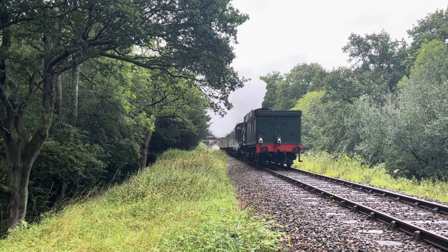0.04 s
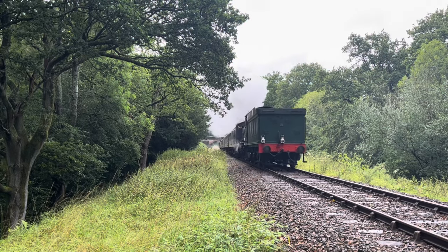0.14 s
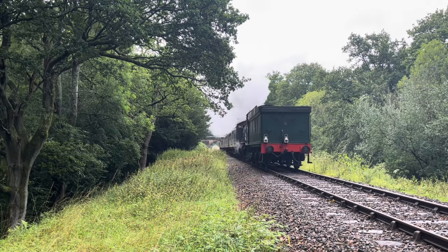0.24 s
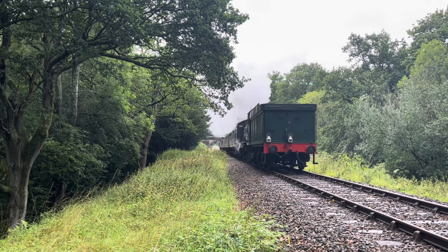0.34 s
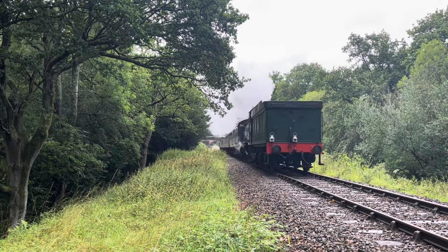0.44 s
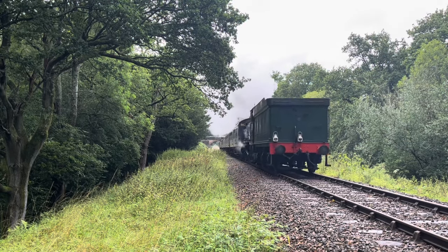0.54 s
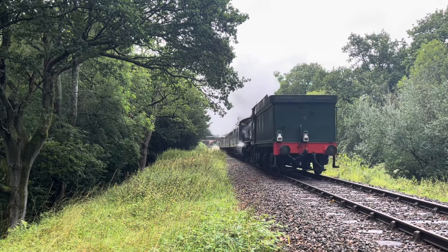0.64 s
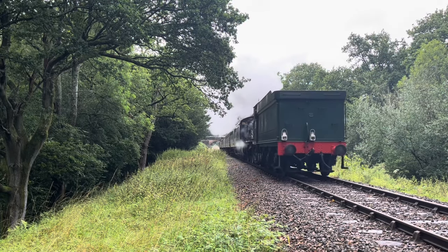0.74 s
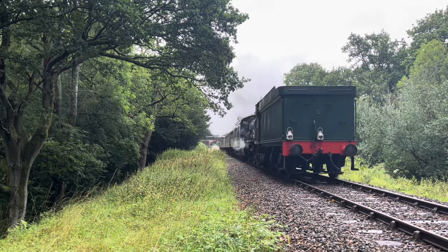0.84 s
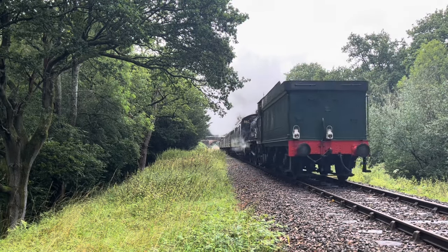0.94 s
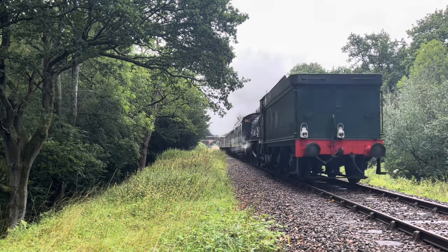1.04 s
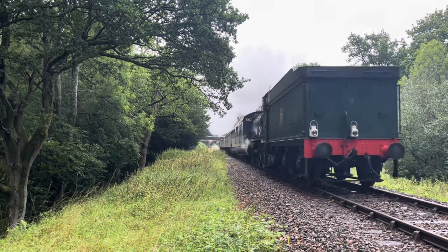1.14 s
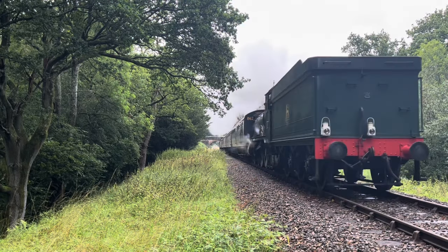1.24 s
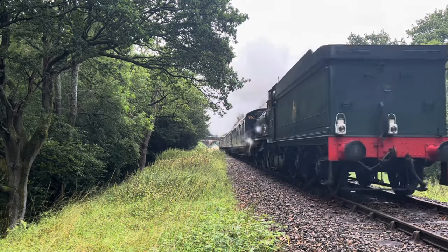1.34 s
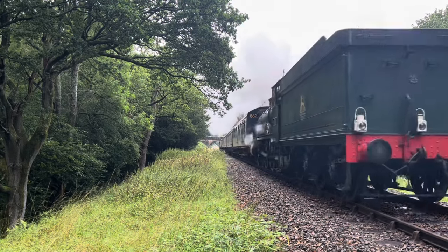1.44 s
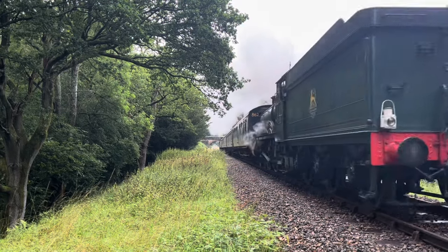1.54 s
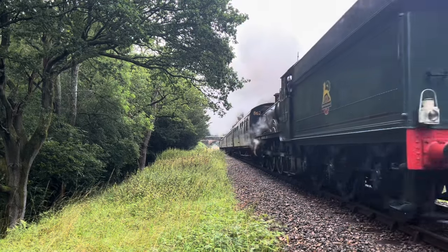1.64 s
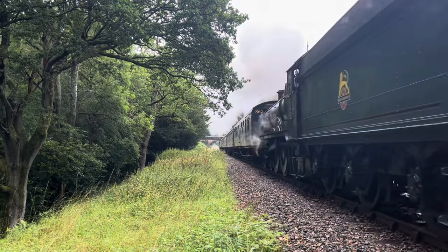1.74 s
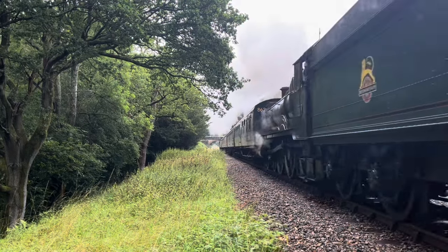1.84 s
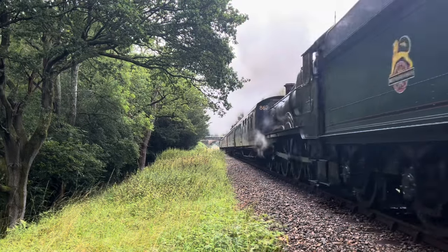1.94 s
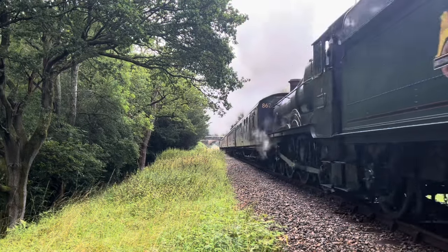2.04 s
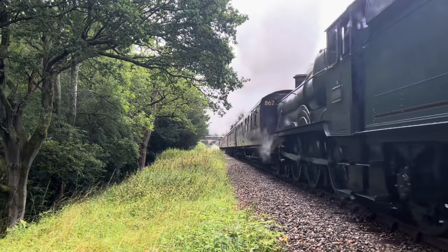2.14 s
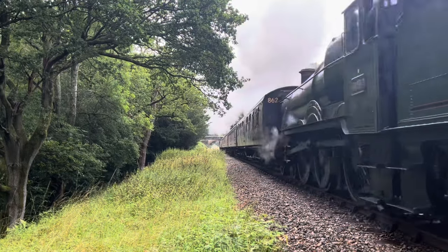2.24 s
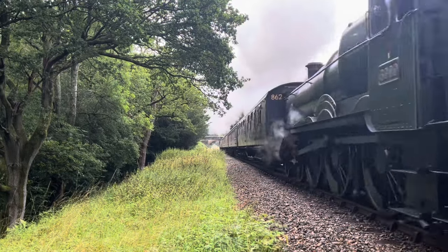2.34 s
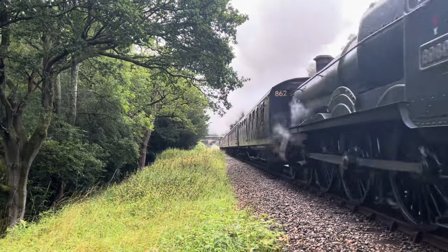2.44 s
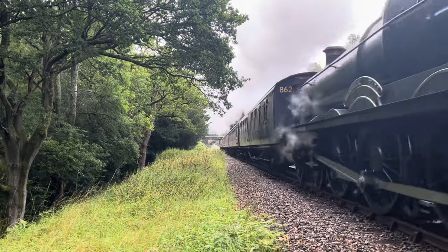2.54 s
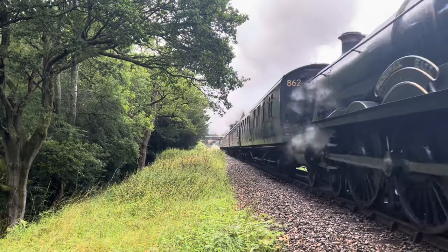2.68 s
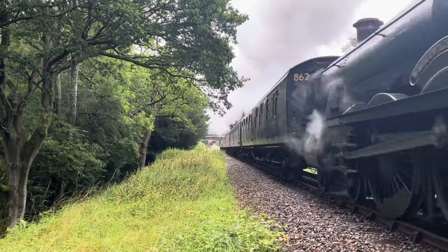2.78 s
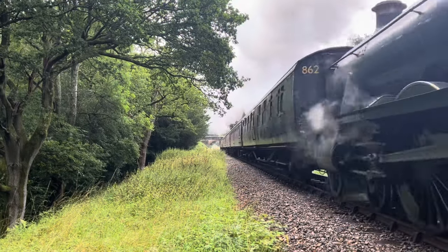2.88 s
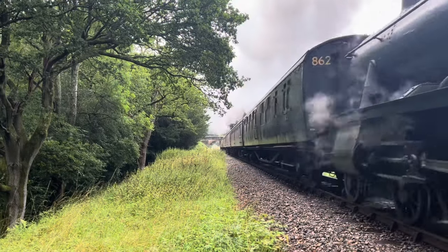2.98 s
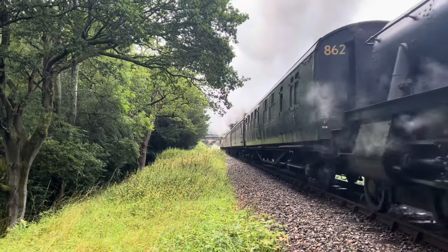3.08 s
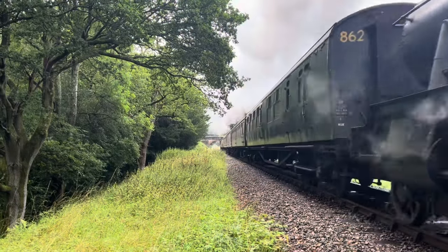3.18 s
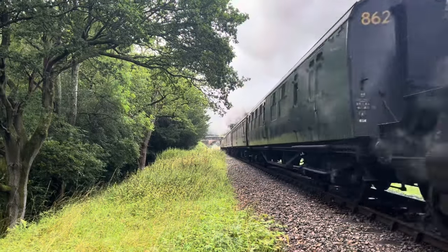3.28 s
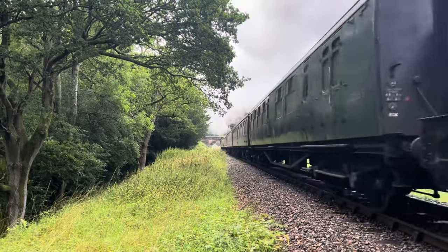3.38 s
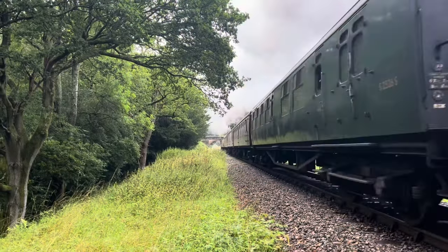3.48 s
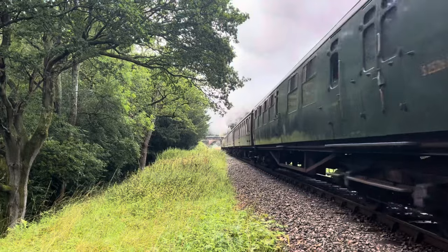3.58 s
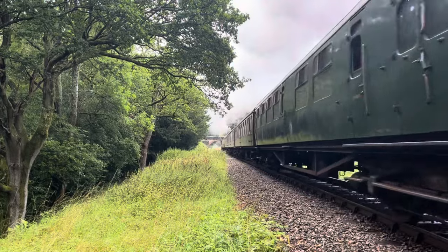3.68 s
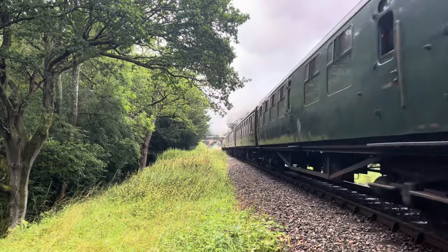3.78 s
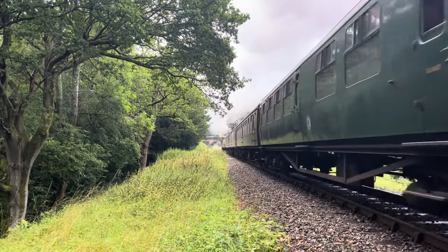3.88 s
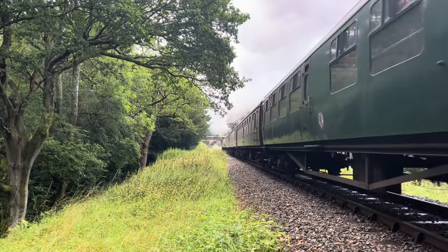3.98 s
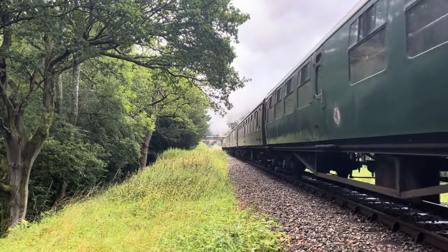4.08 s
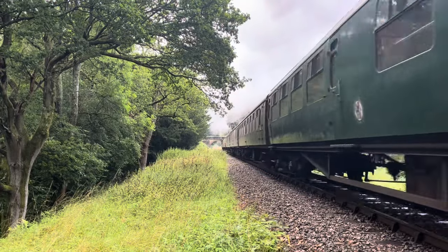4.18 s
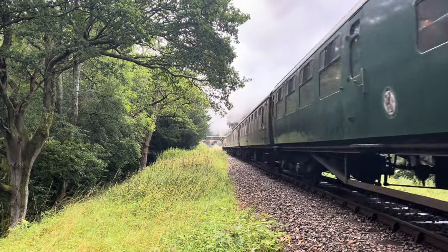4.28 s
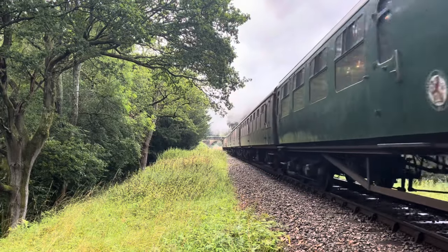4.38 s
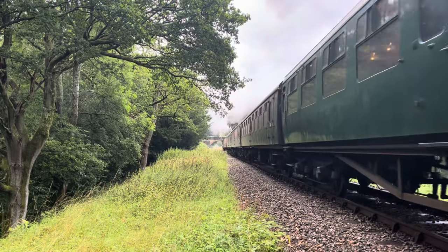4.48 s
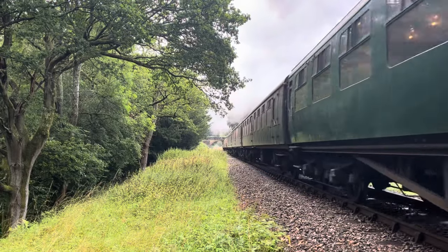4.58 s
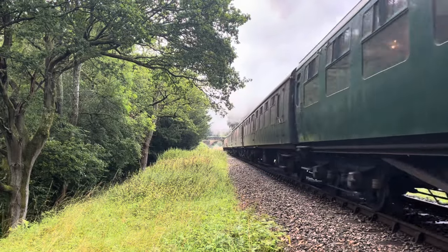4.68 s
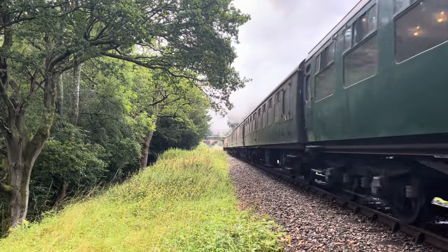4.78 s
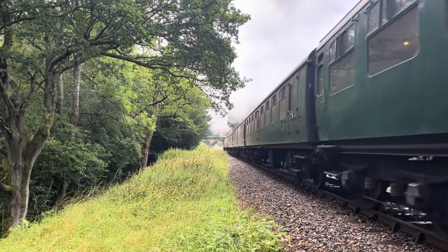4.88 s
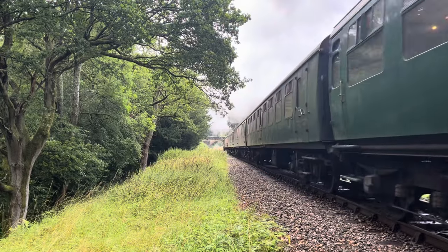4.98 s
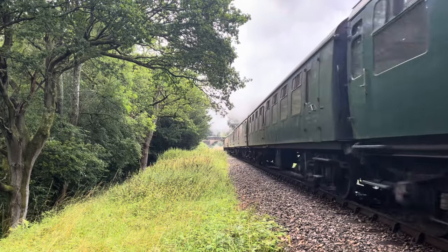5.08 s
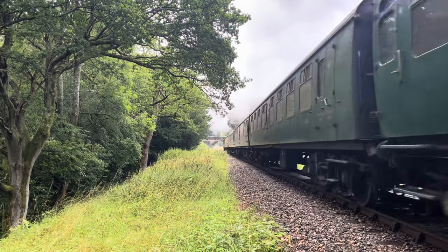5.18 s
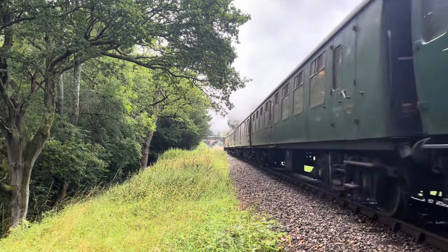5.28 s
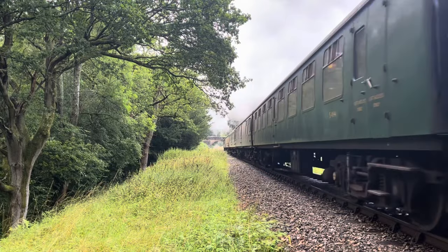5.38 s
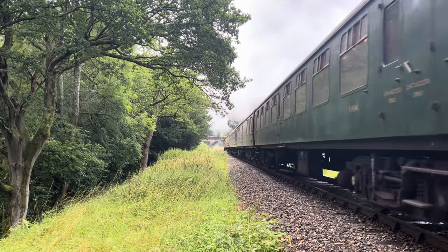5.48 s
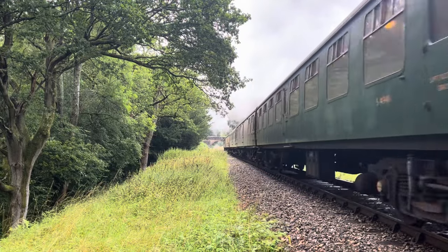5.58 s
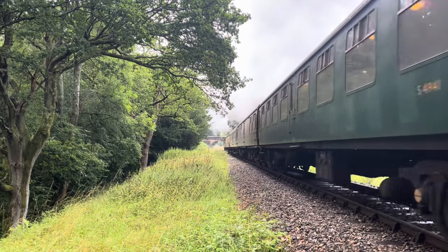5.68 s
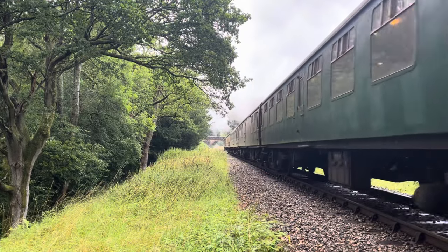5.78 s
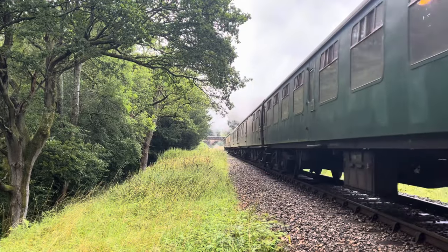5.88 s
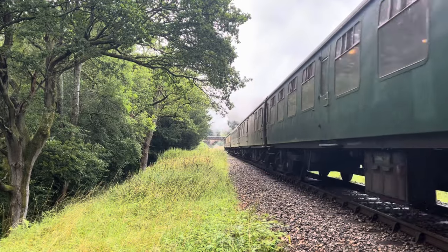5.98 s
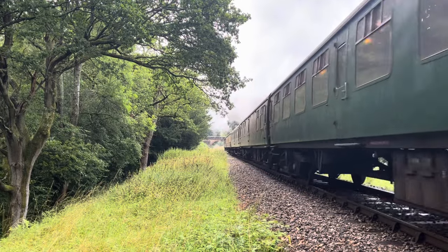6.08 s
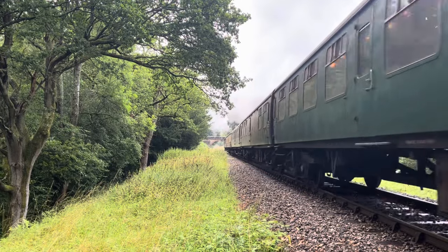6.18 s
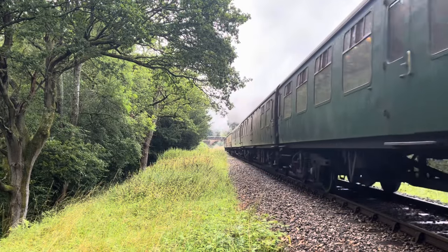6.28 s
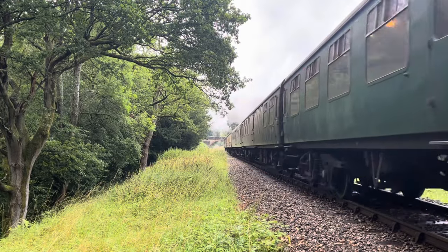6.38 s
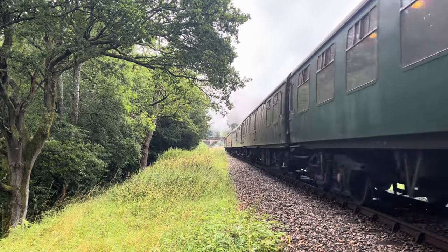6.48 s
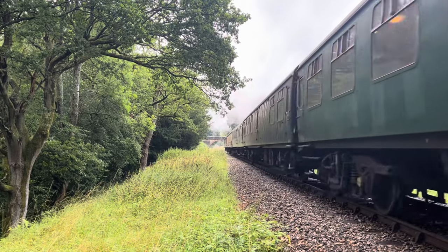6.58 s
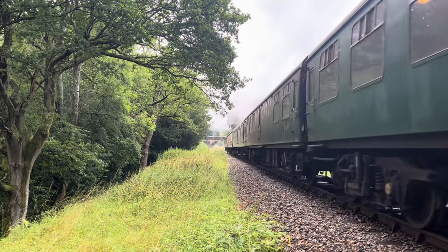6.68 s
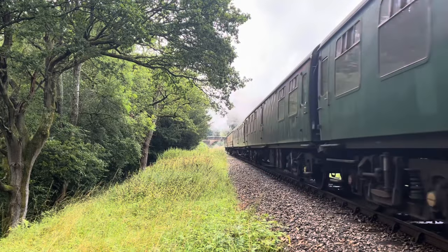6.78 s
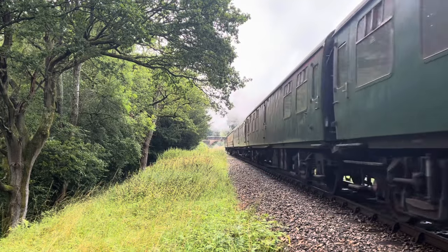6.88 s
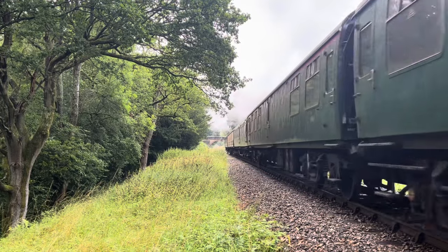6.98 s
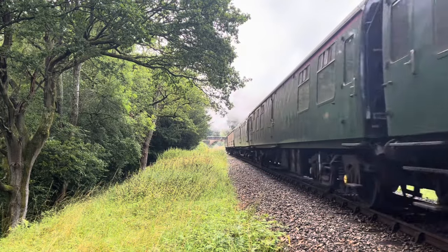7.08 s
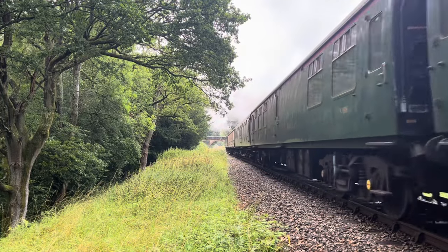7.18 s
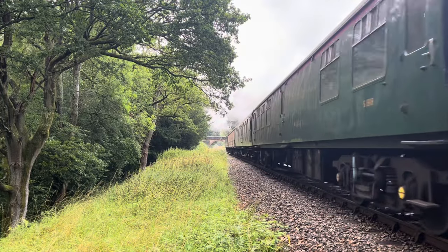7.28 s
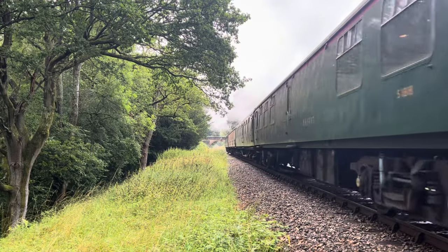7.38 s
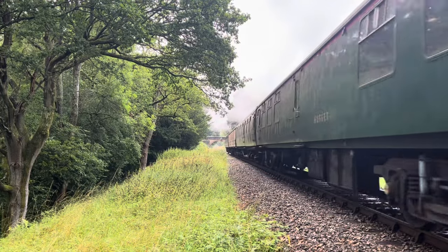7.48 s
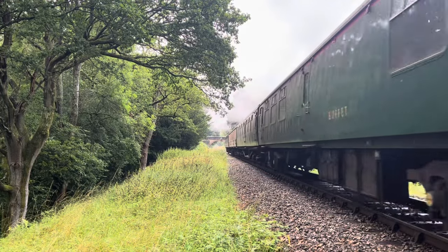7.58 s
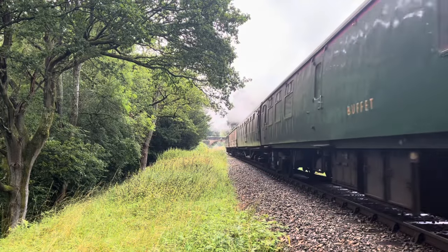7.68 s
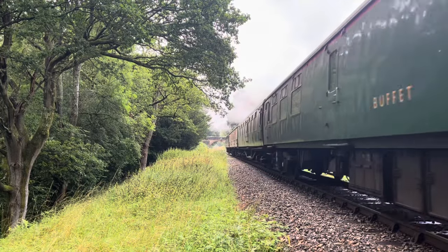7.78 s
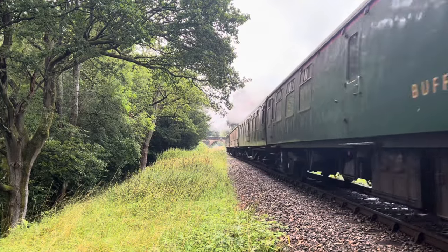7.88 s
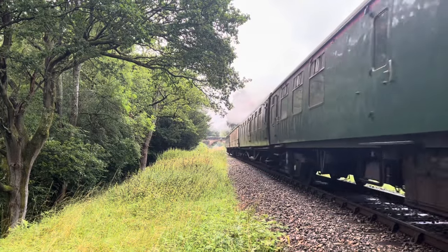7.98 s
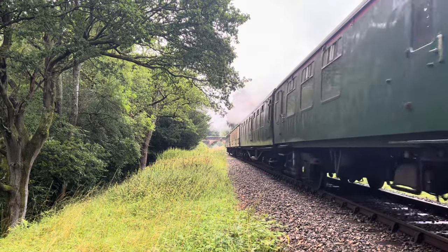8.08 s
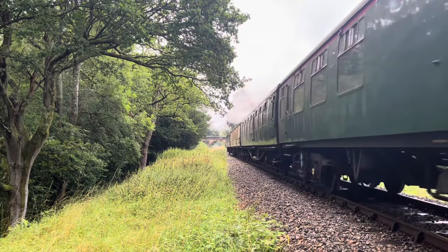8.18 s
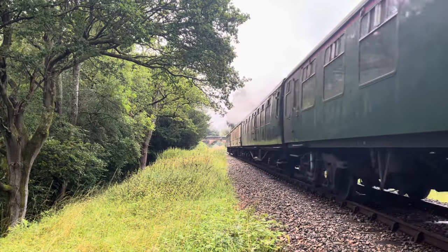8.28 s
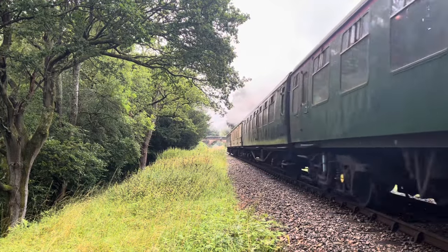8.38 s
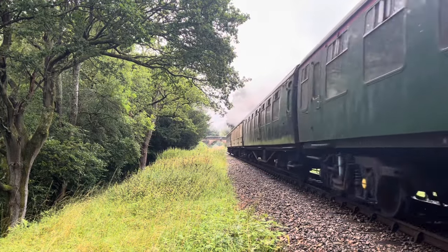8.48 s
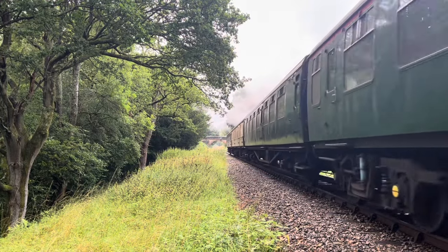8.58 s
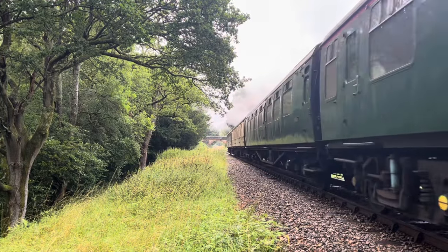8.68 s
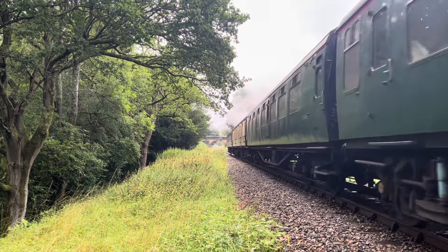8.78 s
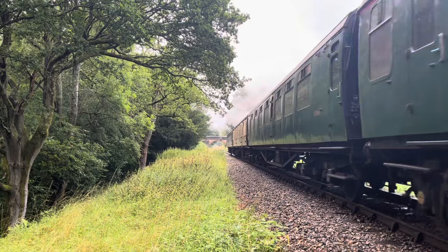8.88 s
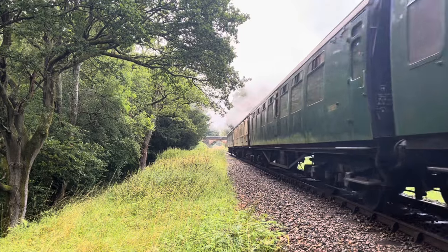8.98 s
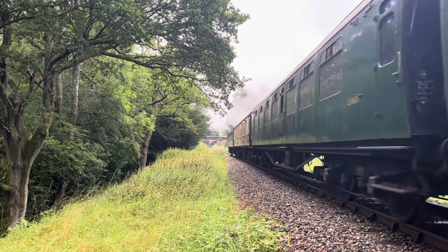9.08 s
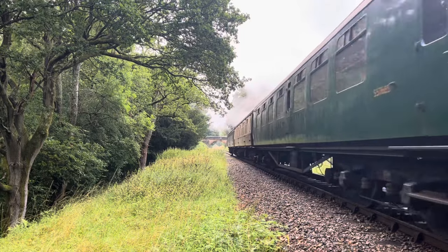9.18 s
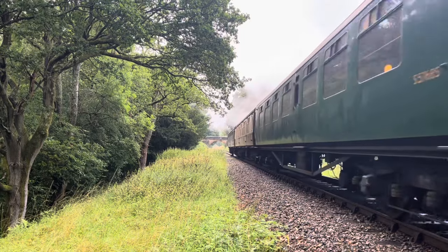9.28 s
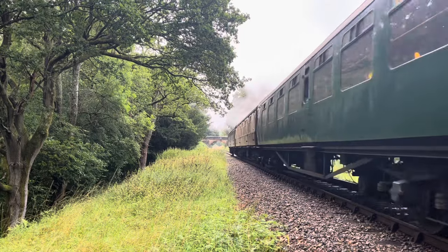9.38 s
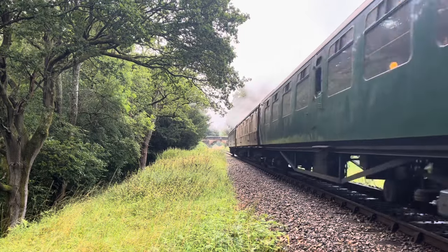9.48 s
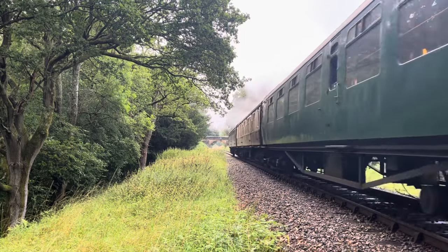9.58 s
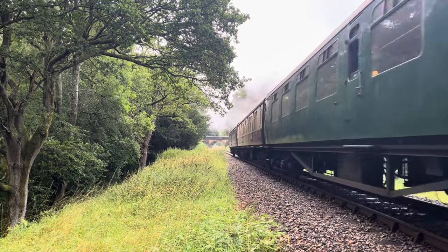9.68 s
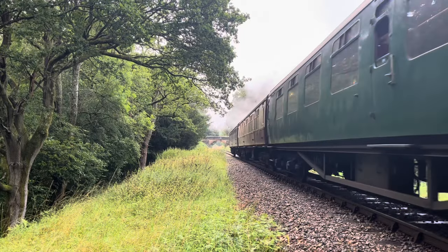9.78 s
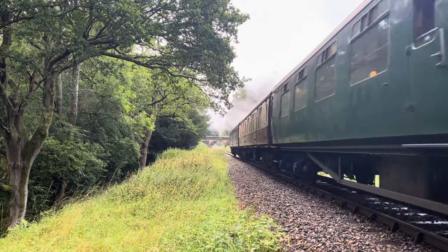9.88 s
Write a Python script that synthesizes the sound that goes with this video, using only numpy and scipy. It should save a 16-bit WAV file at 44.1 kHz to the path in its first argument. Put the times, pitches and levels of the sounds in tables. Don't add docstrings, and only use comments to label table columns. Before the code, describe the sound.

A steam engine chuffs heavily past close by, hissing and clanking, then coaches roll by with paired wheel thuds over a rail joint.

```python
import sys
import numpy as np
from scipy import signal
from scipy.fft import rfft, irfft, next_fast_len
from scipy.io import wavfile
from scipy.ndimage import map_coordinates

SR = 44100
rng = np.random.default_rng(int(sys.argv[2]) if len(sys.argv) > 2 else 0)


def wav_record(signal):
    frames = np.transpose(np.atleast_2d(signal))
    bounded = np.clip(frames, -1, 1)
    quanta = np.round(bounded * 32767).astype(np.int16)
    wavfile.write(sys.argv[1], SR, quanta)


def volts_from_db(level):
    exponent = np.asarray(level, float) / 20
    return 10 ** exponent


N = 438354
SIZE = next_fast_len(N)
TIME = np.arange(N) / SR
HZ = np.maximum(np.arange(SIZE // 2 + 1) * SR / SIZE, 1)

# (time [s], deep thump [dB], chimney note [dB], blast [dB])
BEATS = [(0.089, -14, -22, -39), (0.202, 0, -29, -23), (0.325, 0, -22, -25), (0.472, -9, -23, -29),
         (0.656, 2.5, -34, -17), (0.877, 3, -27, -14), (1.097, 1, -33, -21), (1.418, 0.5, -18, -19),
         (1.543, 0, -15.5, -23), (1.622, -9, -22, -23), (1.836, 1, -17, -23), (1.977, -4, -15, -16),
         (2.209, -1, -9.5, -13.5), (2.325, -2, -15, -17.5), (2.472, -7, -13.5, -15), (2.549, -22, -18, -21),
         (2.708, -10, -18, -24), (2.838, 0, -13, -17.5), (2.959, -1, -15.5, -12.5),
         (3.086, 3.5, -16, -15.5), (3.207, -16, -7, -21), (3.309, 2, -10, -14.5), (3.462, -36, -6, -20.5),
         (3.593, 0, -10.5, -21), (3.722, -19, -11, -17), (3.858, -29, -12.5, -26.5),
         (3.988, -29, -13, -19.5), (4.114, -3, -11.5, -42), (4.254, -23, -21, -27.5),
         (4.377, -34, -16, -21)]
# (thump [dB], chimney note [dB], blast [dB])
RECEDING_DB = (-26, -15, -34)
RECEDING_FROM_S, BEAT_GAP_S, RECEDING_FADE_DB = 4.522, 0.1406, 3.5
BEAT_LENGTH_S, LENGTH_SPREAD = 0.078, 0.026
CHIMNEY_COMING_HZ, CHIMNEY_GOING_HZ, CHIMNEY_ABEAM_S, CHIMNEY_SPREAD = 178.4, 163.7, 3.9, 0.046
# (frequency [Hz], density [dB per Hz])
BLAST = [(140, -19), (230, -2.5), (496, -5), (817, -16), (1520, -25), (1930, -40), (2500, -26), (3250, -90),
         (5500, -120)]
# (frequency [Hz], density [dB per Hz])
SHAKE = [(15, -20), (25, -13), (41, 1.5), (59, 8.5), (113, 0.5), (160, -3.5), (210, -43), (350, -120)]

# (time [s], level [dB])
STEAM = [(0.0, -46.5), (0.8, -43.5), (1.2, -41.5), (1.85, -41.5), (2.15, -39.5), (2.45, -45.5),
         (3.7, -45.5), (5.0, -56.5), (6.2, -61), (7.0, -66), (9.9, -69)]
# (time [s], level [dB], half length [s])
PUFFS = [(1.11, -57, .04), (1.22, -57, 0.025), (1.364, -57, 0.016), (1.87, -51, 0.024), (1.994, -43, 0.027),
         (2.1, -40, 0.024), (2.21, -44, 0.05), (2.31, -41.5, 0.011), (2.503, -45, 0.021),
         (2.605, -45, 0.0096), (2.69, -48, 0.016), (2.76, -51, 0.016), (2.985, -55, 0.052),
         (3.06, -55, 0.034), (3.196, -27, 0.0085), (3.343, -48, 0.015), (3.45, -43, 0.022),
         (3.525, -56, 0.072), (3.706, -42, 0.0086)]
# (frequency [Hz], density [dB per Hz])
HISS = [(600, 15), (1500, 4), (3000, 12), (5000, 9), (8000, 9.5), (11000, 2.5), (13000, 0), (16000, -4)]
# (frequency [Hz], width [Hz], level [dB])
JET = [(4700, 200, -30), (6070, 270, -29), (8670, 230, -25), (10800, 290, -32)]
JET_S, JET_LENGTH_S, SECOND_SPURT_S, SECOND_SPURT_DB = 2.322, 0.016, 0.071, -8
# (start [s], end [s], level [dB])
FIZZ = [
    (2.85, 2.9, -51),
    (2.966, 3.103, -41.5),
    (3.1, 3.15, -45),
    (3.33, 3.41, -49),
    (3.453, 3.56, -44),
    (3.56, 3.643, -45),
]
FIZZ_HZ, FIZZ_WIDTH_HZ, FIZZ_EDGE_S = 11300, 8700, 0.006

# (time [s], crack [dB], thud [dB], brightness [dB])
ENGINE_KNOCKS = [(0.6611, -10.5, -5, 3), (0.846, -22, -5.5, 0.1), (0.875, -9.5, -30, -5),
                 (0.9794, -24, -35, 5), (1.088, -19, -8, 0.1), (1.285, -23, -8.5, 0.1),
                 (1.699, -19.5, -12, -2), (1.87, -21, -34, 0.1), (1.9566, -14.5, -10, 8.5),
                 (2.197, -7, -3, 2), (2.2106, -28, -34, 6), (2.333, -15.5, -4.5, 7), (2.452, -17, -18, -4),
                 (2.5466, -17, -3, 0.1), (2.699, -15, -21, 0.1), (2.763, -15.5, -1.5, 0.1),
                 (2.954, -13.5, -35, 4), (2.9744, -26, -29, 0.1), (3.082, -19.5, -14, -4),
                 (3.1922, -34, -34, 4), (3.2066, -8.5, -21, 2), (3.3, -22, -9.5, 0.1),
                 (3.4694, -31, -29, 7), (3.503, -15.5, -8, 3), (3.654, -20, -8.5, -2),
                 (3.703, -26, -26, 0.1), (3.727, -15.5, -17, 0.1), (3.854, -16, -5.5, -4),
                 (3.9644, -27, -19, 7)]
# (time [s], crack [dB], thud [dB])
AXLES = [(4.145, -23, -7.5), (4.371, -19, -7), (5.46, -20, -5.5), (5.686, -20, -6.5), (6.018, -22.5, -5),
         (6.258, -17, -7), (7.332, -19.5, -3.5), (7.5706, -15.5, -5), (7.895, -19, -3.5),
         (8.132, -16.5, -6.5), (9.207, -16.5, -4.5), (9.448, -17, -7), (9.772, -16.5, -2.5)]
AXLE_BRIGHT_DB, AXLE_RING_DB, ENGINE_RING_DB = 6, -11, -31
FAR_JOINT_LAG_S, FAR_JOINT_THUD_DB = 0.2, -19.5
THUD_LAG_S, BOOM_LAG_S, BOOM_DB = 0.003, 0.0073, -15.5
# (frequency [Hz], density [dB per Hz])
CRACK = [(500, 14), (1200, 8.5), (2500, 2.5), (4000, -6.5), (6000, -32), (9000, -7), (12000, -89),
         (16000, -34)]
# (frequency [Hz], density [dB per Hz])
THUD = [(24, -43), (40, 6), (118, 5), (286, -3.5), (501, -8), (712, -15), (832, -40), (900, -36),
        (1170, -61), (1980, -120)]

# (time [s], peak [dB], frequency [Hz], low mode against it [dB])
RAIL_BENDS = [(4.143, -7, 248, -4), (4.372, -9, 250, 2), (5.461, -9.5, 265, -9), (5.688, -8.5, 259, -6),
              (6.018, -7, 253, -7), (6.257, -5, 308, -10), (7.332, -7, 253, -11), (7.569, -9, 250, -4),
              (7.893, -8, 260, 3), (8.133, -8, 326, -7), (9.207, -7, 262, -5), (9.448, -10, 248, -6),
              (9.772, -2.5, 254, -12)]
BEND_T60_S, BEND_LOW_HZ = 0.16, 133
# (time [s], peak [dB], frequency [Hz])
RIM_CLANKS = [(5.463, -39, 5000), (5.69, -45, 5050), (6.0182, -43, 5070), (6.2587, -33, 5120),
              (7.3312, -35, 4970), (7.5717, -40, 5000), (7.893, -35, 5120), (8.1324, -35, 5100),
              (9.2064, -32, 5140), (9.4479, -35, 5100), (9.7732, -34, 5030)]
RIM_T60_S = 0.23
# (time [s], level [dB], frequency [Hz])
ROD_SONG = [(2.768, -27.5, 1880)]
ROD_T60_S = 0.52
# (level against the crack [dB], hold [s], fall [s])
AXLE_RATTLE = (-12.5, 0.0083, 0.022)
# (frequency [Hz], level [dB])
AXLE_BODY = [(1000, -21), (1380, -3), (1840, -3.5), (2250, -8.5), (2580, -6), (3100, -16), (3650, -30),
             (4480, -17)]
AXLE_BODY_WIDTH_HZ = 127
FIRST_BLOW = 9

# (time [s], peak [dB], frequency [Hz])
SNAPS = [(0.662, -13, 3220), (0.669, -22, 3700), (.848, -30, 2000), (.8755, -28, 3300), (.883, -28, 4200),
         (1.0885, -20, 3400), (1.095, -16, 3500), (1.697, -13, 1550), (2.1975, -13, 1696),
         (2.451, -23, 2100), (2.5485, -19, 2000), (2.701, -15, 1600), (2.761, -15, 2400),
         (2.952, -26, 2100), (3.0827, -18, 2460), (3.1917, -19, 3530), (3.302, -18, 2180),
         (3.6562, -12, 2000), (3.857, -12, 2260), (4.373, -16, 2600), (5.462, -31, 1900), (5.69, -16, 2480),
         (5.849, -28, 2200), (5.916, -29, 3600), (6.0195, -25, 2200), (6.258, -19, 2440),
         (7.332, -25, 2600), (7.5715, -28, 2600), (7.894, -15, 2200), (8.135, -18.5, 2200),
         (9.2075, -19, 2200), (9.4495, -13, 2000), (9.773, -37, 2200)]
SNAP_WIDTH_HZ = 440
# (time [s], level [dB], length [s], top frequency [Hz])
RATTLES = [
    (.664, -27, .025, 1800),
    (2.198, -26, 0.027, 3500),
    (2.335, -22, 0.0075, 3000),
    (2.452, -33, 0.035, 2950),
    (2.548, -29, .005, 2500),
    (2.699, -23, 0.028, 2370),
    (2.953, -26, 0.044, 2100),
    (3.083, -28.5, 0.018, 2800),
]
RATTLE_GRAIN_DB, RATTLE_LOW_HZ, RATTLE_FALL_S = 1.5, 930, 0.003
CLANK_DB, CLANK_FALL_S = 6, 0.011
# (frequency [Hz], width [Hz], level [dB], centre [s], half length [s])
TENDER_SONG = (1969, 50, -44.5, 1.3, 1)
# (time [s], peak [dB], frequency [Hz])
TICKS = [(0.661, -16, 3570), (0.874, -11.5, 3700), (1.087, -16, 3420), (4.031, -17.5, 3900),
         (4.599, -24, 2940), (5.674, -22, 3660), (5.914, -22.5, 2980), (6.238, -23, 3110),
         (6.479, -25, 2600), (6.8794, -34, 2830), (7.552, -20, 3080), (7.791, -24.5, 3700),
         (8.118, -23, 3660), (8.3436, -23.5, 3440), (8.7394, -29, 2880), (9.432, -19, 3640),
         (9.655, -19, 3180)]
# (time [s], level [dB])
MOTION = [(0.0, -59), (0.28, -39), (0.6, -33.5), (0.7, -30), (0.81, -38), (1.25, -32.5), (1.66, -43),
          (2.14, -44), (2.47, -32), (2.67, -35), (3.11, -48), (3.45, -49), (4.2, -51)]
# (time [s], level [dB], frequency [Hz], length [s])
RINGS = [(0.5, -21.5, 140, 0.082), (0.71, -35, 1980, 0.05), (0.663, -15.5, 1060, 0.016),
         (0.91, -33, 1970, .06), (1.1, -24, 1500, 0.015), (1.19, -33, 1640, 0.035), (1.37, -27, 720, .015),
         (1.428, -22, 596, 0.022), (1.498, -18, 730, 0.012), (1.557, -12, 350, 0.016),
         (1.7, -33, 3370, 0.04), (1.84, -39, 3380, .03), (2.35, -32, 1700, 0.055), (2.336, -26, 1200, .01),
         (1.695, -20.5, 1400, 0.0066), (2.19, -14, 1500, 0.022), (2.35, -36, 2000, 0.067),
         (2.697, -18, 1430, 0.018), (2.709, -17.5, 425, 0.044), (2.836, -33, 1880, 0.17),
         (2.953, -24.5, 1350, .035), (2.963, -39, 2380, 0.017), (2.47, -28, 1480, .02),
         (2.4, -40, 2920, 0.013), (2.21, -25, 2900, 0.013), (1.94, -31, 2640, .015),
         (3.34, -38, 2650, 0.033), (3.465, -26.5, 2150, 0.048), (4.146, -19, 1265, 0.0086),
         (4.15, -35, 1710, 0.15)]

# (frequency [Hz], width [Hz], level in the roar [dB], level when struck [dB])
STEEL = [(1326, 38, -15.5, -8), (1399, 28, -12, -23), (1860, 21, -16.5, -17), (2440, 85, -11.5, -13.5),
         (2650, 60, -14.5, -22), (3070, 110, -14, -43), (3720, 31, -20, -49), (4455, 28, -25.5, -19),
         (5015, 28, -58, -32), (1600, 20, -17, -15.5), (2134, 33, -15, -19), (2870, 19, -26, -25),
         (3310, 46, -23.5, -41), (4330, 34, -27, -40)]
# (time [s], low mode [Hz], its level [dB], high mode [Hz], its level [dB])
WHEEL_RINGS = [(4.146, 1244, -22.5, 4322, -50), (4.372, 1725, -31, 4470, -39),
               (5.464, 1266, -28, 4339, -39), (5.689, 1290, -24.5, 4400, -52),
               (6.019, 1302, -27.5, 4355, -50), (6.258, 1320, -35, 4403, -42),
               (7.334, 1365, -36, 4484, -51), (7.571, 1375, -29, 4370, -52), (7.896, 1380, -28, 4400, -38),
               (8.135, 1380, -30.5, 4530, -45), (9.208, 1340, -37, 4450, -34),
               (9.448, 1300, -35, 4306, -37), (9.773, 1266, -24, 4322, -38)]
# (frequency [Hz], level [dB])
SHARED_RINGS = [(2440, -46), (3080, -45), (3780, -55), (1830, -41)]
WHEEL_T60_S, WARBLE_DB, ROUGH_RAD = 0.32, 5, 1.3
# (frequency [Hz], width [Hz], level [dB], centre [s], half length [s])
COACH_HUMS = [
    (336, 8.8, -29.5, 8.6, 0.17),
    (188, 4.8, -31, 6.9, 0.1),
    (340, 15, -31, 6.82, 0.06),
    (183, 9, -30, 12, 0.14),
]

# (time [s], level against its closest [dB])
ENGINE = [(0.0, -3), (0.45, -5.5), (1.0, -2), (1.6, 0.5), (2.2, 1), (2.55, -6.5), (2.95, -4.5), (3.55, -3),
          (3.95, -6.5), (4.6, -16), (5.1, -10.5)]
# (engine at its closest [dB], share of its nearness [1], coach mean [dB], bogie swell [dB])
GROUND_SHAKE = (-19.5, 0.97, -29.5, 1)
BODY_RUMBLE = (-18, 1.8, -26, 1.4)
RAIL_ROAR = (-29, 1.26, -42.5, 2)
WHEEL_SONG = (-42, 0.5, -39.5, 2.5)
COACHES_ARRIVE_S, ARRIVAL_S, GROWTH_DB_PER_S = 3, 0.5, 0.49
COACH_S, BOGIES_ABEAM_S = 1.875, 5.85
SPEED_SHARE = 0.024
# (frequency [Hz], density [dB per Hz])
RUMBLE = [(59, 1), (100, -3.5), (182, 1.5), (242, -4), (332, -1), (641, -14), (760, -16), (881, -26.5),
          (1140, -55), (1370, -16), (1500, -29.5), (1950, -31), (3300, -120)]
# (frequency [Hz], density [dB per Hz])
ROAR = [(500, 10), (1000, 7), (1500, 4), (2500, -2), (3500, -8), (5000, -12.5), (8000, -27.5), (12000, -39),
        (16000, -39)]

# (frequency [Hz], phase [rad])
PORT_PHASE = [(0, -.05), (430, -.95), (800, -2.5), (1600, -2.25), (1750, -6.0), (4400, -5.6), (5000, -5.9),
              (5500, -7.3), (6500, -7.4), (7400, -8.3), (7850, -9.42), (8900, -9.42), (9600, -11.2),
              (11200, -12.57), (13100, -12.57), (13700, -13.1), (14000, -14.6), (14600, -15.71)]
# (frequency [Hz], level [dB])
PORT_BALANCE = [(60, .8), (370, .9), (690, 2.1), (1150, -5), (1600, -5), (1850, -.3), (3500, 2.5),
                (5000, 0), (7000, 0)]
# (frequency [Hz], coherence [0-1])
PORT_LIKENESS = [(60, .995), (300, .99), (600, .74), (1600, .68), (1850, .93), (3000, .8), (3700, .6),
                 (7300, .78), (7900, .998), (8900, .998), (9300, .75), (10800, .75), (11400, .997),
                 (13000, .997), (13500, .65), (14400, .7), (14700, 1)]


def exhaust():
    receding = [(RECEDING_FROM_S + k * BEAT_GAP_S, *(np.array(RECEDING_DB) - k * RECEDING_FADE_DB))
                for k in range(8)]
    s, thump_db, note_db, blast_db = np.transpose(BEATS + receding)
    chance = rng.standard_normal((len(s), 2))
    length = BEAT_LENGTH_S * np.exp(LENGTH_SPREAD * chance[:, 0])
    passed = 1 / (1 + np.exp((CHIMNEY_ABEAM_S - s) / 0.22))
    note_hz = CHIMNEY_COMING_HZ + passed * (CHIMNEY_GOING_HZ - CHIMNEY_COMING_HZ)
    note_hz = note_hz * np.exp(CHIMNEY_SPREAD * chance[:, 1])
    thump = coloured(white() * bursts(s - .008, thump_db - 13, 0.0045, length), SHAKE)
    note = blown_notes(s - .008, note_db, note_hz, 28, 0.0091, 0.5 * length)
    blast = coloured(white() * bursts(s - .006, blast_db + 0.14, 0.0024, 0.63 * length), BLAST)
    return thump + butterworth(note, 1, 900) + blast


def steam():
    leak_db, = in_time(STEAM)
    t = TIME[:4 * SR:8]
    puffs = 0
    for s, db, half in PUFFS:
        skewed_half = half * np.where(t < s, 0.55, 1.45)
        puffs = puffs + volts_from_db(db) * bell(t, s, skewed_half)
    level = volts_from_db(leak_db) + np.interp(TIME, t, puffs)
    hiss = level * volts_from_db(6 + 2.2 * drift(35)) * coloured(white(), HISS)
    span = slice(0, 3 * SR)
    spurts = bell(TIME[span], JET_S, JET_LENGTH_S)
    spurts = spurts + volts_from_db(SECOND_SPURT_DB) * bell(TIME[span], JET_S + SECOND_SPURT_S, JET_LENGTH_S)
    gust = white()[:, span] * spurts * volts_from_db(1.7 * drift(50)[span]) + 1e-9
    hiss[:, span] += sum(volts_from_db(db) * resonance(gust, hz, width) for hz, width, db in JET)
    return hiss


def fizz():
    t = TIME[:4 * SR]
    gate = 0
    for start, end, db in FIZZ:
        opening = np.tanh((t - start) / FIZZ_EDGE_S) - np.tanh((t - end) / FIZZ_EDGE_S)
        gate = gate + volts_from_db(db) * opening / 2
    gust = white()[:, :len(t)] * (gate * volts_from_db(2.2 * drift(50)[:len(t)]) + 1e-9)
    once = resonance(gust, FIZZ_HZ, FIZZ_WIDTH_HZ)
    out = np.zeros((2, N))
    out[:, :len(t)] = resonance(once, FIZZ_HZ, FIZZ_WIDTH_HZ)
    return out


def knocks():
    s, crack_db, thud_db, _, bright_db = all_knocks()
    tail = bursts(s, crack_db - 15.5, 0.0068, 0.03) * volts_from_db(4 * drift(55))
    crack = coloured(white() * (bursts(s - .0015, crack_db - 4, 0.00084, 0.0062) + tail), CRACK)
    top = white() * bursts(s - .0015, crack_db + bright_db - 35, .0006, .012)
    top = butterworth(top, 2, 5500, "high")
    axle_s, _, axle_db = np.transpose(AXLES)
    far_s = axle_s[:-1] + FAR_JOINT_LAG_S
    pushes = bursts(s + THUD_LAG_S, thud_db - 3, 0.0031, 0.022)
    pushes = pushes + bursts(far_s, np.full(len(far_s), FAR_JOINT_THUD_DB), 0.0031, 0.014)
    thud = coloured(white() * pushes, THUD)
    boom = white() * bursts(axle_s + BOOM_LAG_S, axle_db + BOOM_DB, 0.0043, 0.02)
    return crack + top + thud + resonance(boom, 89, 27)


def all_knocks():
    engine = [(s, crack, thud, ENGINE_RING_DB, bright) for s, crack, thud, bright in ENGINE_KNOCKS]
    coaches = [(s, crack, thud, AXLE_RING_DB, AXLE_BRIGHT_DB) for s, crack, thud in AXLES]
    return np.transpose(engine + coaches)


def joint():
    gain_db, hold, fall = AXLE_RATTLE
    out, t = np.zeros((2, N)), TIME[:SR // 8]
    contacts = rng.standard_normal((len(AXLES), 2, len(t))) ** 3 / 4
    contacts[:, :, 0] = FIRST_BLOW
    contacts = butterworth(contacts, 2, 4200)
    grain = held_chance(len(AXLES), 132, len(t))
    favour = rng.standard_normal((len(AXLES), len(AXLE_BODY)))
    for (s, crack, _), burst, uneven, favours in zip(AXLES, contacts, grain, favour):
        gate = volts_from_db(crack + gain_db + 3.7 * uneven) * np.exp(-np.maximum(t - hold, 0) / fall) + 1e-9
        start = int((s + .001) * SR)
        for (hz, db), f in zip(AXLE_BODY, favours):
            mode = resonance(burst * gate, hz, AXLE_BODY_WIDTH_HZ)
            out[:, start:start + len(t)] += volts_from_db(db + 3.3 * f) * mode
    highs = [(s, db - 3, hz) for s, db, hz, _ in RAIL_BENDS]
    lows = [(s + 0.0026, db + low_db - 0.5, BEND_LOW_HZ) for s, db, _, low_db in RAIL_BENDS]
    bends = struck(highs + lows, 0.004, BEND_T60_S, 1.5)
    rims = struck([(s, db - 7, hz) for s, db, hz in RIM_CLANKS], 0.0008, RIM_T60_S, 8.3)
    return out + bends + rims + struck(ROD_SONG, 0.006, ROD_T60_S, 6.3)


def snaps():
    out, t = np.zeros((2, N)), TIME[:600]
    grit = rng.standard_normal((len(SNAPS), 2, len(t)))
    for (s, level_db, hz), noise in zip(SNAPS, grit):
        blow = (t == 0) + 0.14 * noise * np.exp(-t / 0.0015)
        ring = resonance(blow, hz, SNAP_WIDTH_HZ)
        start = int(s * SR)
        out[:, start:start + len(t)] += volts_from_db(level_db) * ring / np.abs(ring).max()
    return out


def rattles():
    out, t = np.zeros((2, N)), TIME[:SR // 8]
    noise = rng.standard_normal((len(RATTLES), 2, len(t)))
    grain = held_chance(len(RATTLES), 88, len(t))
    for (s, level_db, length, top_hz), burst, uneven in zip(RATTLES, noise, grain):
        fade = np.exp(-np.maximum(t - length, 0) / RATTLE_FALL_S)
        gate = volts_from_db(level_db + RATTLE_GRAIN_DB * uneven) * fade
        clatter = butterworth(burst * gate, 2, [RATTLE_LOW_HZ, top_hz], "band")
        start = int(s * SR)
        out[:, start:start + len(t)] += clatter * np.sqrt(SR / 2 / top_hz)
    return out


def frames():
    s, crack_db, _, _ = np.transpose(ENGINE_KNOCKS)
    noise = white()
    blows = noise * bursts(s, crack_db + CLANK_DB, 0.0023, CLANK_FALL_S) * volts_from_db(3 * drift(55))
    clank = butterworth(blows, 2, [550, 1600], "band")
    hz, width_hz, song_db, centre, half = TENDER_SONG
    swell = bell(TIME, centre, half) * volts_from_db(song_db + 3.2 * drift(9.7))
    return clank + resonance(noise[::-1] * (swell + 1e-9), hz, width_hz)


def ticks_and_rods():
    tick_s, tick_db, tick_hz = np.transpose(TICKS)
    ticks = blown_notes(tick_s - .001, tick_db - 12.5, tick_hz, 620, 0.00043, 0.0094)
    ring_s, ring_db, ring_hz, length = np.transpose(RINGS)
    rods = blown_notes(ring_s, ring_db, ring_hz, 51, 0.0014, length)
    motion_db, = in_time(MOTION + [(13.0, -58)])
    grains = white() * volts_from_db(motion_db + 12 + 5.8 * np.minimum(drift(35), 1))
    return ticks + butterworth(grains, 2, [600, 1600], "band") + rods


def steel():
    s, crack_db, _, ring_db, _ = all_knocks()
    s = s + doppler_swing(s)
    noise, out, singing_db = white(), 0, rolled_db(WHEEL_SONG)
    for hz, width, sung_db, struck_db in STEEL:
        favour_db = rng.normal(0, 2.5, len(s))
        flicker_db = 1.6 * drift(12) + 2 * drift(2.5)
        blows = bursts(s, crack_db + ring_db + struck_db + favour_db, .002, .045)
        singing = volts_from_db(singing_db + sung_db + flicker_db)
        out = out + resonance(noise * (blows + singing), hz, width)
    return np.array([np.interp(TIME + doppler_swing(TIME), TIME, side) for side in out])


def wheels():
    out, t = np.zeros((2, N + SR)), TIME[:SR // 3]
    chance = rng.standard_normal((len(WHEEL_RINGS), len(SHARED_RINGS), 2))
    beat = rng.uniform(0, 1, (len(WHEEL_RINGS), 6, 2))
    shiver = np.array([drift(59), drift(59)])
    for (s, low_hz, low_db, high_hz, high_db), draws, beats in zip(WHEEL_RINGS, chance, beat):
        modes = [(low_hz, low_db), (high_hz, high_db)]
        modes += [(hz * np.exp(0.0108 * a), db + 3 * b) for (hz, db), (a, b) in zip(SHARED_RINGS, draws)]
        start = int(s * SR)
        for (hz, db), (rate, turn) in zip(modes, beats):
            warble_db = WARBLE_DB * np.sin(2 * np.pi * ((15 + 25 * rate) * t + turn))
            fade = volts_from_db(db + warble_db - 60 * t / WHEEL_T60_S) * (1 - np.exp(-t / 0.0022))
            fray = ROUGH_RAD * shiver[:, int(rate * 9 * SR):][:, :len(t)]
            phase = 2 * np.pi * (hz * t + np.array([[0], [turn]])) + fray
            out[:, start:start + len(t)] += fade * np.sin(phase)
    noise, hums = white(), 0
    for hz, width, db, centre, half in COACH_HUMS:
        hums = hums + resonance(noise * (volts_from_db(db) * bell(TIME, centre, half) + 1e-9), hz, width)
    return out[:, :N] + hums


def rolling():
    shake = coloured(white() * volts_from_db(rolled_db(GROUND_SHAKE) + 1.5 + 2.6 * drift(12)), SHAKE)
    lumps_db = 1.6 * drift(14) + 2.2 * drift(45)
    rumble = coloured(white() * volts_from_db(rolled_db(BODY_RUMBLE) + lumps_db), RUMBLE)
    grit = white() * volts_from_db(rolled_db(RAIL_ROAR) + 1.5 + 1.3 * drift(30))
    roar = coloured(grit * volts_from_db(0.9 * drift(4)), ROAR)
    return shake + rumble + roar


def rolled_db(layer):
    engine_db, share, coach_db, swell_db = layer
    near_db, = in_time(ENGINE + [(8.4, -43)])
    bogies = np.cos(2 * np.pi * (TIME - BOGIES_ABEAM_S) / COACH_S)
    arrived = 1 / (1 + np.exp((COACHES_ARRIVE_S - TIME) / ARRIVAL_S))
    growth_db = GROWTH_DB_PER_S * (TIME - BOGIES_ABEAM_S)
    coaches = arrived * volts_from_db(coach_db + swell_db * bogies + growth_db)
    return 10 * np.log10(volts_from_db(engine_db + share * near_db) ** 2 + coaches ** 2)


def doppler_swing(t):
    return SPEED_SHARE * COACH_S / (2 * np.pi) * np.cos(2 * np.pi * (t - BOGIES_ABEAM_S) / COACH_S)


def echoes(blows):
    dull = butterworth(blows[::-1], 1, 2500)
    paths = [(.047, -19), (.083, -21), (.131, -23)]   # (delay [s], level [dB])
    return sum(volts_from_db(db) * np.roll(dull, int(lag * SR), axis=1) for lag, db in paths)


def blown_notes(times, levels_db, notes_hz, width_hz, rise_s, fall_s):
    out, noise = np.zeros((2, N)), white()
    for s, level_db, hz, fall in zip(times, levels_db, notes_hz, np.broadcast_to(fall_s, len(times))):
        span = slice(int(s * SR), int((s + 6 * fall + .08) * SR))
        shape = swell_and_fall(TIME[span] - TIME[span][0], rise_s, fall)
        out[:, span] += resonance(noise[:, span] * (volts_from_db(level_db) * shape + 1e-9), hz, width_hz)
    return out


def struck(rows, rise_s, t60_s, warble_db):
    out, t = np.zeros((2, N + SR)), TIME[:SR // 4]
    chance = rng.uniform(0, 1, (len(rows), 3, 2, 1))
    for (s, level_db, hz), (turn, rate, start) in zip(rows, chance):
        waver_db = warble_db * np.sin(2 * np.pi * ((25 + 40 * rate) * t + start))
        fade = volts_from_db(level_db + waver_db - 60 * t / t60_s) * (1 - np.exp(-t / rise_s))
        first = int(s * SR)
        out[:, first:first + len(t)] += fade * np.sin(2 * np.pi * (hz * t + turn))
    return out[:, :N]


def bursts(times, levels_db, rise_s, fall_s):
    out = np.full(N, 1e-9)
    for s, level_db, fall in zip(times, levels_db, np.broadcast_to(fall_s, len(times))):
        start = max(int(s * SR), 0)
        t = TIME[:min(N - start, int(9 * (fall + rise_s) * SR))]
        out[start:start + len(t)] += volts_from_db(level_db) * swell_and_fall(t, rise_s, fall)
    return out


def swell_and_fall(t, rise_s, fall_s):
    shape = (1 - np.exp(-t / rise_s)) ** 2 * np.exp(-t / max(fall_s, .002))
    return shape / shape.max()


def bell(t, centre, half):
    return np.exp(-.5 * ((t - centre) / half) ** 2)


def resonance(x, hz, width_hz):
    r = np.exp(-np.pi * width_hz / SR)
    poles = [1, -2 * r * np.cos(2 * np.pi * hz / SR), r * r]
    return signal.lfilter([1, 0, -1], poles, x) * np.sqrt((1 - r * r) / 2)


def butterworth(x, order, hz, kind="low"):
    return signal.sosfilt(signal.butter(order, hz, kind, fs=SR, output="sos"), x)


def coloured(x, spectrum):
    low, high = spectrum[0][0], spectrum[-1][0]
    ends = np.minimum(HZ / low, 1) ** 4 * np.minimum(high / HZ, 1) ** 4
    gain = volts_from_db(at_hz(spectrum)) * ends
    return irfft(rfft(x, SIZE) * gain / np.sqrt(np.mean(gain ** 2)), SIZE)[:, :N]


def at_hz(points):
    hz, value = np.transpose(points)
    return np.interp(np.log(HZ), np.log(hz), value)


def in_time(rows):
    s, *columns = np.transpose(rows)
    return [np.interp(TIME, s, c) for c in columns]


def white():
    return rng.standard_normal((2, N))


def drift(rate):
    knots = rng.standard_normal(int(N / SR * 60) + 2)
    return map_coordinates(knots, [TIME[::64] * np.clip(rate, .1, 59)], order=3).repeat(64)[:N]


def held_chance(rows, hold, length):
    return rng.standard_normal((rows, length // hold + 1)).repeat(hold, axis=1)[:, :length]


def scene():
    blows = exhaust() + knocks()
    engine = steam() + fizz() + frames() + snaps() + rattles() + ticks_and_rods()
    train = joint() + steel() + wheels() + rolling()
    return blows + echoes(blows) + engine + train


def roll_off(x):
    return signal.sosfilt(signal.butter(12, 15700, fs=SR, output="sos"), x)


def record(dry):
    shared, own = rfft(dry, SIZE)
    alike = np.clip(at_hz(PORT_LIKENESS), 0, 1)
    turn = np.exp(-1j * np.interp(HZ, *np.transpose(PORT_PHASE)))
    bass_loss = (HZ / 45) ** 2 / (1 + (HZ / 45) ** 2)
    balance_db = at_hz(PORT_BALANCE)
    left = shared * volts_from_db(balance_db / 2) * bass_loss
    mixed = alike * shared + np.sqrt(1 - alike ** 2) * own
    right = mixed * turn * volts_from_db(-balance_db / 2) * bass_loss
    heard = irfft(np.array([left, right]), SIZE)[:, :N]
    limited = heard / (1 + (heard / .97) ** 6) ** (1 / 6)
    return roll_off(limited)


dry = scene()
out = record(dry)
wav_record(out)
```